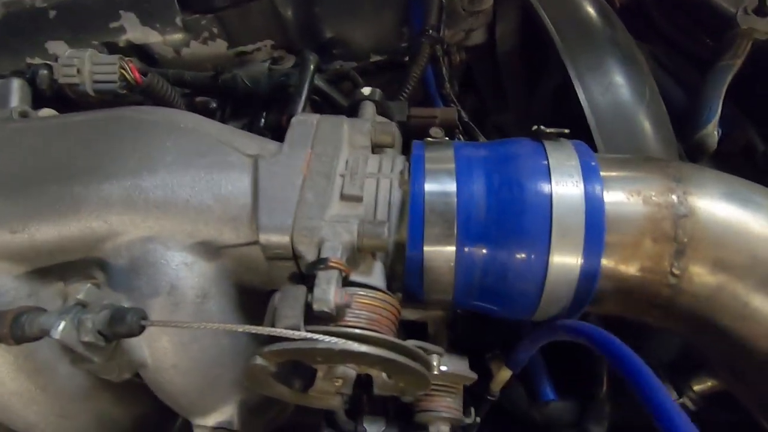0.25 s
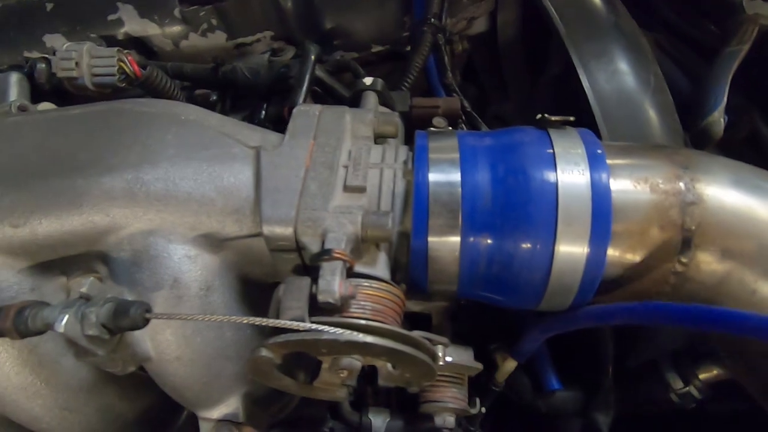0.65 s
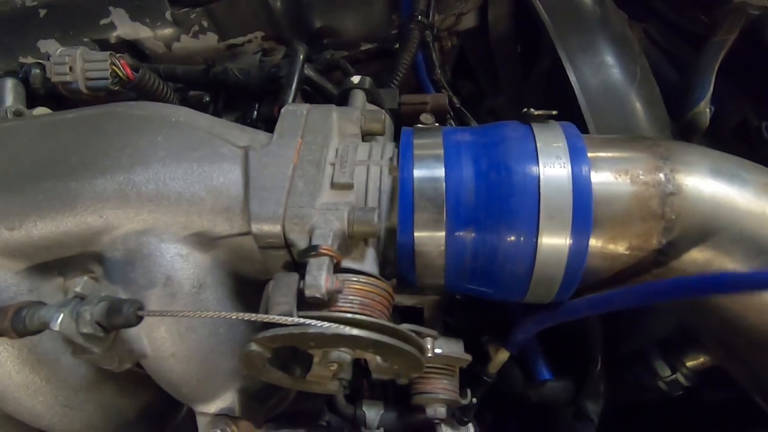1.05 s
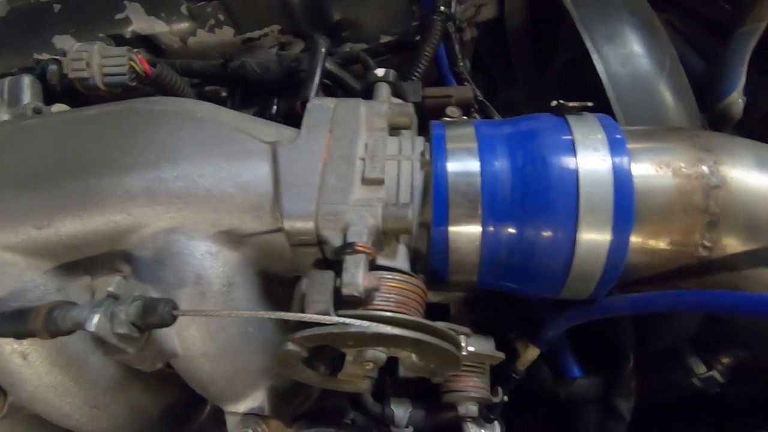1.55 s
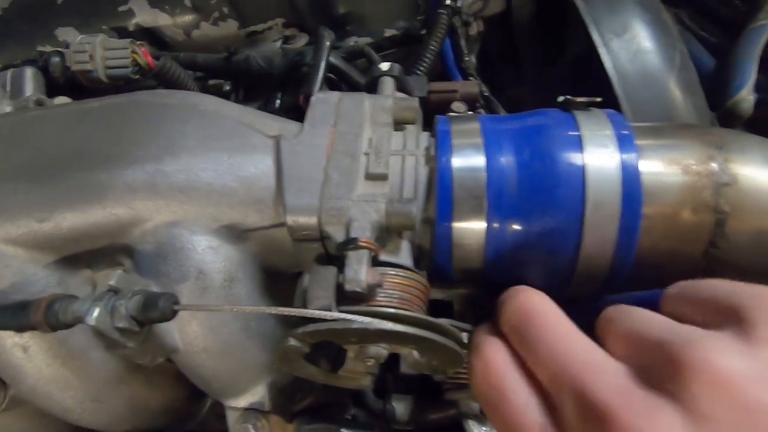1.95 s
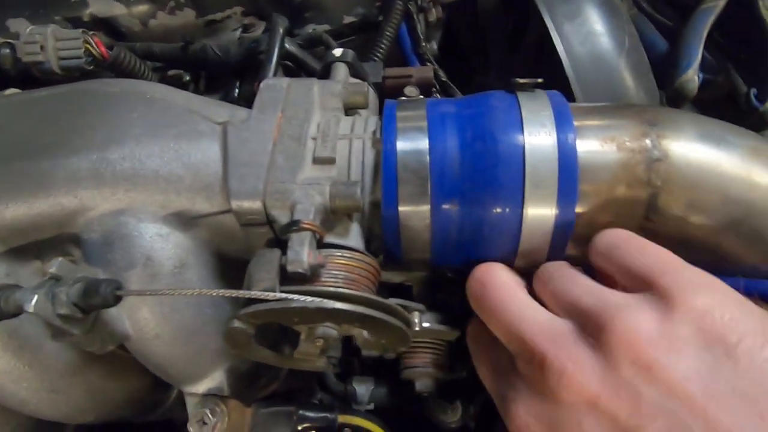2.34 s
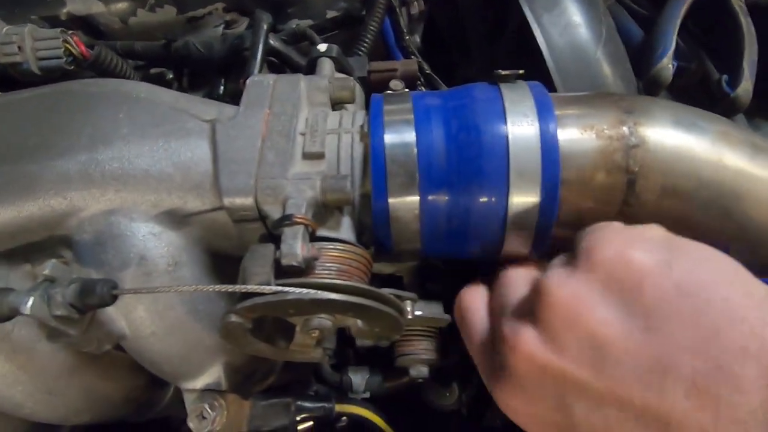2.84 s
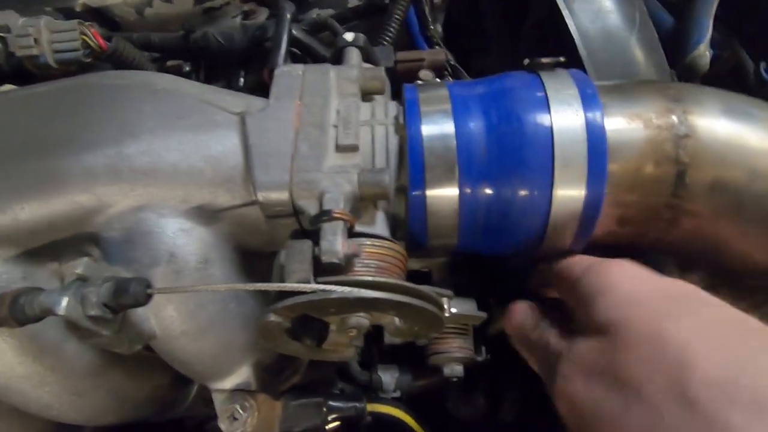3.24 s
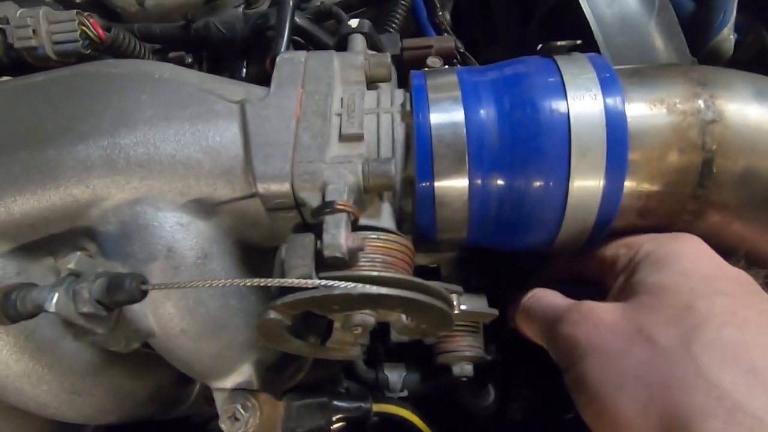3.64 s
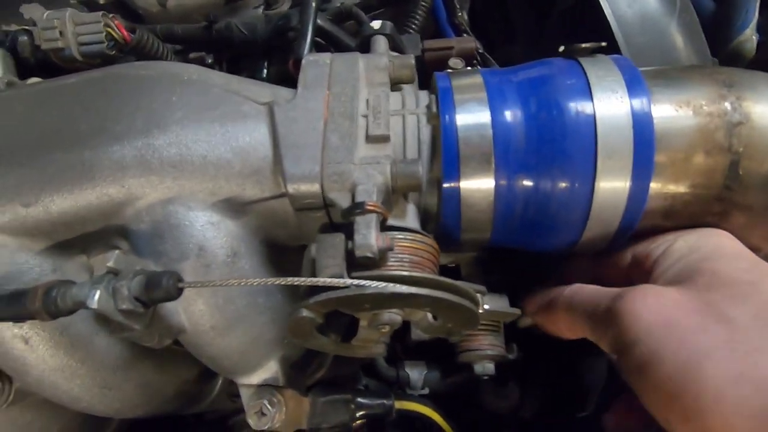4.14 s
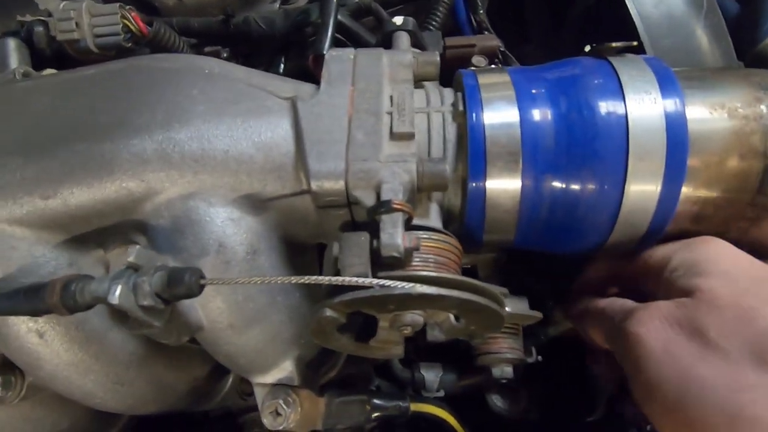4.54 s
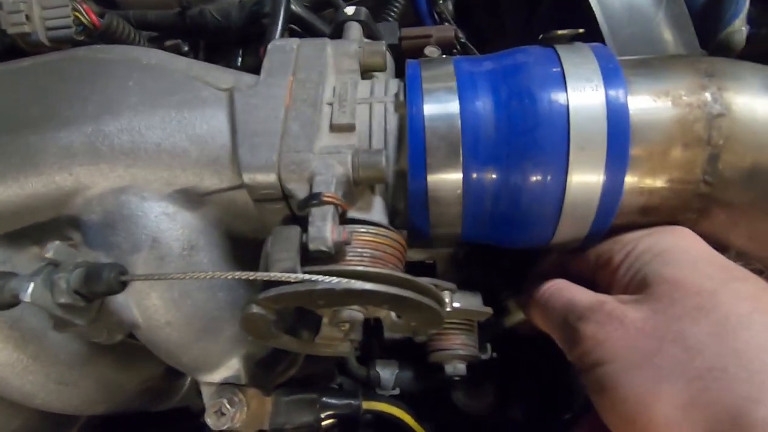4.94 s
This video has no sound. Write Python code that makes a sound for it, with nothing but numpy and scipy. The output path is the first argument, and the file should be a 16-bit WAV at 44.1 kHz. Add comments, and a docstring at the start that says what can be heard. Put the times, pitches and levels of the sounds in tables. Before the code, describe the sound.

From 0 to about 0.23 s, a coarse gush of air falls in hiss while the pipe's ringing around 3 to 5 kHz swells, then stops abruptly with a faint bump. A strong leak takes over at once: a breathy whistle scooping up to roughly 7.5 kHz over a broad rush and fine fizz. Its surge fades over the first second or so; it continues to the end at about 5 s, slowly weakening, narrowing and wavering. A hard, hollow knock lands near 1.45 s with rubbing and scuffs until 1.85 s. Soft thuds and low drags follow at 1.95 to 2.6 s. From 3.0 to 3.8 s comes a busy cluster of knocks and rubs, strongest near 3.15 and 3.43, as the hand slightly colours the hiss. Another knock falls at 4.37, faint taps and rubbing after 4.7. Close, right-leaning stereo; tight engine-bay reflections, faint garage tail, very quiet low drone.

```python
"""A leak of compressed air hisses and whistles near 7.5 kHz, close to a two-port microphone in a garage.
A hose feeds a car's intake piping: a broad gush of coloured noise is cut off and the leak takes over.
The whistle is resonant noise with a tonal core; it narrows as the pressure sinks. Noise makes the rush.
A hand reaches under the pipe: knocks and bumps ring damped modes, scuffs and rubs are friction noise.
Reflections off the engine bay, a faint garage tail and a low drone lie behind."""
import sys
import numpy as np
from scipy import signal
from scipy.fft import rfft, irfft, next_fast_len
from scipy.io import wavfile
from scipy.ndimage import uniform_filter1d

SR = 44100
rng = np.random.default_rng(int(sys.argv[2]) if len(sys.argv) > 2 else 0)


def waveform_to_disk(signal):
    """Save audio, clipped to [-1, 1], as 16-bit WAV at the path in sys.argv[1]."""
    frames = np.transpose(np.atleast_2d(signal))
    scaled = np.clip(frames, -1, 1) * 32767
    samples = np.round(scaled).astype(np.int16)
    wavfile.write(sys.argv[1], SR, samples)


N = 228886
SIZE, HOP = 512, 128  # spectral frame and its step [samples]
HZ = np.fft.rfftfreq(SIZE, 1 / SR)
FRAME_S = np.arange(N // HOP + 5)[:, None] * HOP / SR  # frame times, as a column
TIME = np.arange(N) / SR

# The hose seats in the pipe: the gush is cut off and the leak takes over.
SEAT_S, SEAT_TAKES_S = 0.234, 0.0055
# The surge of pressure left by the gush dies away with this time constant.
SURGE_S = 0.6
# How squarely the jet meets the edge of the gap; on it the whistle swells, off it a hollow rings:
# (time [s], aim [dB])
AIM = [(0.27, -1), (0.33, 2), (0.55, 0.5), (0.615, -2.5), (0.79, 1.5), (0.93, -3), (1.11, -4.5),
       (1.27, 1.5), (1.43, -1.5), (1.62, 0.5), (1.77, -1), (2.23, -3.5), (2.35, 1.5), (2.71, -0.5),
       (3.12, 2), (3.65, 0.5), (3.87, 3.5), (3.94, -2.5), (4.02, 2), (4.27, 1), (4.36, 4.5), (4.5, -1),
       (4.68, -1), (4.93, 1), (5.15, -1)]
# Where the leak lies as the microphone drifts, before each layer's own offset:
# (time [s], left minus right [dB])
LEAK_PAN = [(0.26, -6.5), (0.42, -6), (2.3, -1), (4.39, -3.5), (4.47, 0), (5.19, -6)]


def amp(db):
    """Decibels to gain."""
    return 10 ** (np.asarray(db) / 20)


def evened(x):
    """Scales to an rms of one."""
    return x / np.sqrt(np.mean(x ** 2) + 1e-20)


def read(points, hz=HZ):
    """A spectrum joined by straight lines on a log-frequency axis."""
    f, value = np.transpose(points)
    return np.interp(np.log(hz + 1), np.log(f + 1), value)


def follow(points, t=FRAME_S):
    """A curve joined by straight lines, at the times t."""
    s, value = np.transpose(points)
    return np.interp(t, s, value)


def sampled(control):
    """A value a frame, spread over the samples."""
    return np.interp(TIME, FRAME_S[:, 0], control[:, 0])


def add(mix, s, sound):
    """Mixes a stereo sound in at time s."""
    part = mix[:, max(round(s * SR), 0):][:, :sound.shape[1]]
    part += sound[:, :part.shape[1]]


def placed(x, pan_db):
    """Shares the power of x between left and right; pan_db is left minus right."""
    gains = np.array([amp(pan_db / 2), amp(-pan_db / 2)]).reshape(2, -1)
    return x * gains / np.sqrt(np.mean(gains ** 2, 0))


def filtered(x, response):
    """Applies a fixed frequency response."""
    size = next_fast_len(N + SIZE)
    return irfft(rfft(x, size) * response(np.fft.rfftfreq(size, 1 / SR)), size)[..., :N]


def resonance(hz, centre_hz, width_hz):
    """Gain of one resonance."""
    return 1 / np.sqrt(1 + (2 * (hz - centre_hz) / width_hz) ** 2)


def peaks(rows, hz=HZ):
    """Lift in dB of a set of resonances."""
    return sum(db * resonance(hz, f, width) ** 2 for f, width, db in rows)


def unit(shape, band=slice(None)):
    """Scales a spectrum so that noise through it has an rms of one in the band."""
    return shape / np.sqrt(np.sum(shape[..., band] ** 2, -1, keepdims=True) / len(HZ))


def wander(slow_hz, fast_hz):
    """Random drift of rms one, a sum of sines between two rates, a value a frame."""
    rates = np.geomspace(slow_hz, fast_hz, 40)
    turns = rates * FRAME_S + rng.random(len(rates))
    return evened(np.sin(2 * np.pi * turns).sum(1))[:, None]


def eddies(frames=5, bins=9):
    """Random patches of rms one over time and frequency."""
    field = rng.standard_normal((len(FRAME_S), len(HZ)))
    return evened(uniform_filter1d(uniform_filter1d(field, frames, 0), bins, 1))


def lingering(depth_db):
    """Narrow airy bands in dB that last about a fifth of a second as the jet wanders."""
    return depth_db * eddies(frames=70, bins=3)


def ports(hz):
    """Gain and phase with which each of the two microphone ports hears the leak."""
    # The port pair: (frequency [Hz], left leads by [rad], left minus right [dB])
    port_rows = [(493, 0, 1.5), (1170, 2, -4.5), (3220, 0.5, -1), (5970, -3.5, 1.5), (6000, -3, -1),
                 (7300, -2.5, 1.5), (7940, -2, 1.5), (8760, -4.5, 6), (15800, -8.5, 6)]
    f, lead, pan_db = np.transpose(port_rows)
    lead = read(np.c_[f, lead], hz)
    pan_db = read(np.c_[f, pan_db], hz)
    return placed(np.exp(np.array([[.5j], [-.5j]]) * lead), pan_db)


def noise(gain, alike):
    """Noise with a gain per frame and bin; the jet is wide, so the ports share only a part of its power."""
    white = rng.standard_normal((3, (len(FRAME_S) - 1) * HOP))
    z = signal.stft(white, nperseg=SIZE, noverlap=SIZE - HOP)[2]
    pair = np.sqrt(alike) * z[0] + np.sqrt(1 - alike) * z[1:]
    heard = pair * ports(HZ)[:, :, None] * gain.T
    return signal.istft(heard, nperseg=SIZE, noverlap=SIZE - HOP)[1][:, :N]


def garage_drone(level_db=-71.5):
    """The garage's low drone: steady noise with a fixed colour, slightly different at each port."""
    # Relative colour: (frequency [Hz], level [dB])
    garage_colour = [(20, -20), (70, -10), (115, -35), (153, 6.5), (190, -5), (300, -6), (700, -25),
                     (3000, -20.5)]
    white = rng.standard_normal((2, N))
    mid, side = evened(filtered(white, lambda hz: amp(read(garage_colour, hz))))
    return amp(level_db) * (mid + np.array([[.3], [-.3]]) * side)


def echoes(x, t60, count=3, apart_hz=500, drift_s=1.467):
    """Dense reflections, alike at both ports in the bass, that shift as the microphone drifts."""
    t = np.arange(SR // 2) / SR
    highpass = signal.butter(2, apart_hz, "high", fs=SR, output="sos")
    out = np.zeros((2, N))
    for k in range(count):
        mid, side = rng.standard_normal((2, len(t))) * amp(-60 * t / t60) * (t > .002)
        side = signal.sosfilt(highpass, side)
        tail = np.array([mid + side, mid - side]) / np.linalg.norm(mid + side)
        # the shares of the tails trade places while their total power holds
        share = np.cos(np.pi * (TIME / drift_s + k / count)) * np.sqrt(2 / count)
        out += signal.oaconvolve(x * share, tail, axes=1)[:, :N]
    return out


def ring(modes, tilt_db=0, rise_cycles=1.0, scatter=0.031):
    """A padded blow rings slightly scattered modes, each swelling over about a cycle; peak of one."""
    t = np.arange(SR // 5) / SR
    hz, db, t60 = np.transpose(modes)[:, :, None]
    hz = hz * (1 + scatter * rng.standard_normal(hz.shape))
    decay = amp(db + tilt_db * np.log2(hz / hz.mean()) - 60 * t / t60)
    rise = 1 - np.exp(-(t * hz / rise_cycles) ** 2)
    tone = (decay * rise * np.sin(2 * np.pi * hz * t)).sum(0)
    return tone / abs(tone).max()


def crack(hz=2450, half_width_octaves=0.41, fade_s=0.00067):
    """The short hard click of first contact, a band of fading noise; peak of one."""
    t = np.arange(SR // 50) / SR
    edges_hz = hz * 2 ** (np.array([-1, 1]) * half_width_octaves)
    band = signal.butter(2, edges_hz, "band", fs=SR, output="sos")
    click = signal.sosfilt(band, rng.standard_normal(len(t)) * np.exp(-t / fade_s))
    return click / abs(click).max()


def knocks(knock_db=2, crack_db=-6):
    """Knocks of hand and hose on the piping: each a crisp touch, then the full weight, with a crack."""
    # Blows, before the level offsets: (time [s], level [dB], upper ring against the whole [dB])
    knock_rows = [(1.443, -22, 2), (1.473, -32, 6), (1.483, -40, 10), (1.492, -39.5, 8), (1.792, -52.5, 3),
                  (2.991, -45.5, -4), (3.057, -43.5, 2), (3.092, -39.5, 9), (3.144, -29, 11.5),
                  (3.206, -34.5, 14), (3.339, -33.5, 7.5), (3.358, -49, 0), (3.433, -27.5, 11.5),
                  (3.482, -45, 9.5), (3.507, -39.5, 0), (3.558, -42.5, 16), (3.576, -34, 11),
                  (3.633, -45, 4), (3.747, -42, 0.5), (3.761, -42.5, -8), (3.777, -38.5, 11),
                  (3.798, -40.5, -10), (4.369, -31.5, 4), (4.383, -41, -15), (4.707, -51.5, -8),
                  (4.761, -43, 11), (4.774, -53.5, 11.5), (4.965, -51, 1)]
    # The two landings of a blow: (delay [s], level [dB], tilt [dB per octave])
    contacts = [(-.0018, -2.5, 1.0), (.0023, -1.5, 0)]
    # Nominal ring of the piping: (frequency [Hz], relative level [dB], t60 [s])
    pipe_modes = [(483, 8.5, 0.028), (570, -2, 0.0073), (758, 8.5, 0.02), (972, 1, 0.035), (1107, 4, 0.018),
                  (1314, 2, 0.018), (1600, 0, 0.0092), (2140, -10, 0.013)]
    out = np.zeros((2, N))
    hardest_db = max(db for _, db, _ in knock_rows)
    for s, db, bright_db in knock_rows:
        click_db = db + crack_db + (db - hardest_db)  # softer knocks crack far less
        add(out, s - .001, placed(amp(click_db) * crack(), pan_db=-12))
        for delay_s, blow_db, tilt_db in contacts:
            tone = ring(pipe_modes, tilt_db + 0.66 * (bright_db - 4.0))
            add(out, s + delay_s, placed(amp(db + knock_db + blow_db) * tone, pan_db=-7))
    return out


def bumps():
    """Soft bumps ring only the low modes of the piping."""
    # (time [s], peak level [dB])
    bump_rows = [(0.232, -52), (1.449, -47), (1.952, -44.5), (2.409, -47.5), (2.47, -55), (3.152, -46),
                 (3.208, -43.5), (3.747, -45.5), (3.79, -48.5)]
    # Nominal low modes: (frequency [Hz], relative level [dB], t60 [s])
    thud_modes = [(79, -17.5, 0.1), (152.3, -11.5, 0.19), (207.5, -9.5, 0.1), (263, -11.5, 0.045)]
    out = np.zeros((2, N))
    for s, db in bump_rows:
        add(out, s - .002, placed(amp(db) * ring(thud_modes), pan_db=-1.5))
    return out


def stroke(start_s, length_s, level_db, rise_s=0.0031, fade_db=-6, release_s=0.026):
    """Grip of one stroke over time: it takes hold, eases along the way and lets go."""
    t = TIME - start_s
    fade = amp(level_db + fade_db * np.clip(t / length_s, 0, 1))
    return np.clip(t / rise_s, 0, 1) * fade * np.exp(-np.maximum(t - length_s, 0) / release_s)


def rubbing(strokes, colour, grain_db):
    """Uneven friction noise under a set of strokes."""
    grip = sum(stroke(*row) for row in strokes) * amp(grain_db * sampled(wander(13, 90)))
    return grip * evened(filtered(rng.standard_normal(N), lambda hz: amp(read(colour, hz))))


def friction(scuff_db=2):
    """The hand rubs along the pipe, drags on the rubber hose so the piping rumbles, and scuffs the metal."""
    # Strokes along the pipe, drags on the hose, and short bright scuffs of skin on metal (before scuff_db):
    # (start [s], length [s], level at the start [dB])
    strokes = [(1.298, 0.2, -58), (1.447, 0.1, -53), (1.572, 0.28, -59.5), (2.33, 0.29, -71),
               (2.63, 0.13, -58.5), (2.985, 0.063, -54.5), (3.15, 0.2, -55), (3.33, 0.596, -59),
               (3.74, 0.083, -50), (4.278, 0.26, -65), (4.69, 0.3, -62.5)]
    drags = [(2.015, 0.29, -63.5), (2.325, 0.25, -61.5)]
    scuffs = [(1.468, 0.006, -42), (1.603, 0.021, -48), (1.662, 0.029, -53), (1.788, 0.017, -49),
              (2.394, 0.015, -53.5), (3.203, 0.017, -46), (4.272, 0.026, -55.5), (4.76, 0.036, -58)]
    # Their relative colours: (frequency [Hz], level [dB])
    rub_colour = [(75, -22), (115, -24), (160, 3), (270, -1), (450, 2), (800, -5), (2000, -14), (6000, -57)]
    drag_colour = [(100, -24.5), (160, 1.5), (205, -5), (400, -16), (1500, -60)]
    scuff_colour = [(150, -12.5), (450, 5.5), (1000, -2.5), (2400, -3), (4300, -9), (8000, -43)]
    rub = placed(rubbing(strokes, rub_colour, grain_db=1.5), pan_db=-1.5)
    drag = rubbing(drags, drag_colour, grain_db=2.0)
    scuff = placed(amp(scuff_db) * rubbing(scuffs, scuff_colour, grain_db=2.5), pan_db=-1.5)
    return rub + drag + scuff


def hand():
    """Everything the hand does: impacts ring the piping and sliding makes friction noise."""
    return knocks() + bumps() + friction()


def seated(early_s=0):
    """Zero while the hose is loose, one once it sits, a value a frame."""
    return np.clip((FRAME_S - SEAT_S + early_s) / SEAT_TAKES_S, 0, 1)


def surge(fade_s=SURGE_S):
    """What is left of the surge of pressure: one until the hose seats, then towards zero, a value a frame."""
    return np.exp(-np.maximum(FRAME_S - SEAT_S, 0) / fade_s)


def cavities(hz, low_hz=140):
    """The spaces round the leak lift their own frequencies; below about 140 Hz the hiss fades away."""
    # Air resonances of the piping and the spaces round it: (frequency [Hz], width [Hz], lift [dB])
    air_modes = [(440, 83, 4), (876, 370, 6), (2597, 41, 6.5), (3218, 50, 5.5), (3610, 140, 1.5)]
    return amp(peaks(air_modes, hz)) * (1 - 1 / (1 + (hz / low_hz) ** 4))


def gush(level_db=-35, burst_db=8.5, burst_s=0.09, swell_db=4.5, start_hz=8800, end_hz=4200, fall_s=0.048,
         lift_db=9, width_hz=900, patchy_db=2.0):
    """Air spills past the hose end with a falling hiss; the pipe rings more and more until the gush stops."""
    # Relative colour: (frequency [Hz], level [dB])
    gush_colour = [(850, -19.5), (1700, -5.5), (2600, -3), (4400, -9), (6000, 2.5), (7800, 3), (8800, -5),
                   (12000, -12.5), (15500, -31)]
    # The pipe's resonances, driven harder as the gap closes:
    # (frequency [Hz], width [Hz], lift once closed [dB])
    gush_rings = [(3280, 190, 27), (4100, 260, 12), (4740, 660, 19.5)]
    closing = np.clip(FRAME_S / SEAT_S, 0, 1) ** 1.5
    blow_db = level_db + burst_db * np.exp(-FRAME_S / burst_s) + swell_db * closing ** 2
    centre_hz = end_hz + (start_hz - end_hz) * np.exp(-FRAME_S / fall_s)
    lifts_db = lift_db * resonance(HZ, centre_hz, width_hz) ** 2 + closing * peaks(gush_rings)
    shape = unit(amp(read(gush_colour) + lifts_db))
    gain = shape * amp(blow_db + patchy_db * eddies()) * (1 - seated())
    return placed(filtered(noise(gain, alike=0.76), cavities), pan_db=-5.5)


def swells():
    """Lift in dB over time and frequency of bands that swell or sink for a while as the jet shifts."""
    # (middle [s], length [s], frequency [Hz], width [Hz], lift [dB])
    swell_rows = [(0.547, 0.14, 5600, 704, 15), (0.628, 0.11, 910, 900, 9), (0.71, 0.17, 4540, 1200, -13),
                  (0.85, 0.79, 2590, 607, 6.5), (1.1, 0.066, 3970, 800, 5.5), (1.21, 0.26, 1990, 250, 4),
                  (1.41, 0.42, 3330, 900, -9), (1.906, 2.1, 3720, 130, 5.5), (2.787, 0.29, 1980, 300, 4.5),
                  (2.76, 0.31, 3920, 700, 4.5), (4.057, 0.19, 3660, 420, 4.5), (4.116, 0.28, 480, 454, -14),
                  (4.6, 1.6, 1850, 260, -4.5), (5.04, 0.43, 1020, 190, 4)]
    lift_db = 0
    for s, length, hz, width, db in swell_rows:
        presence = 1 / (1 + (2 * (FRAME_S - s) / length) ** 6)
        lift_db = lift_db + db * resonance(HZ, hz, width) ** 2 * presence
    return lift_db


def cupped(from_s=2.9, takes_s=0.27):
    """The hand closes round the leak; the hollow under it lifts some tones and cancels others, in dB."""
    # (frequency [Hz], width [Hz], lift once closed [dB])
    cup_modes = [(970, 83, 5.5), (1530, 170, 2.5), (2430, 210, -4), (3010, 98, 0.5), (3980, 120, 5),
                 (4300, 220, -1.5), (5300, 170, -3)]
    return np.clip((FRAME_S - from_s) / takes_s, 0, 1) * peaks(cup_modes)


def rush(stir, body_db=-1.5, thin_db=-9.5, thin_below_hz=1770, thin_s=0.66, hollow_hz=3850,
         hollow_width_hz=1200, hollow_db=-2, hollow_surge_db=8, hollow_share=0.63):
    """The body of the escaping air, turbulent noise that rings a hollow when the jet slips off the edge."""
    # Relative colour: (frequency [Hz], level [dB])
    body_colour = [(100, -8), (600, -15), (1300, -7), (2000, -1.5), (2500, -4.5), (3300, 0.5), (4100, 1.5),
                   (4600, -0.5), (6000, -3), (8000, -2.5), (11000, -44)]
    # Level before body_db and the lifts: (time [s], level [dB])
    rush_level = [(0.27, -38.5), (0.39, -47), (0.57, -42.5), (0.71, -46.5), (1.01, -47.5), (1.11, -46),
                  (1.73, -48), (1.91, -51.5), (2.45, -49), (3.03, -48.5), (3.35, -50), (5.15, -52.5)]
    lift_db = hollow_db + hollow_surge_db * surge() - hollow_share * follow(AIM)
    hollow = lift_db * resonance(HZ, hollow_hz, hollow_width_hz) ** 2
    # a strong jet is thin at the bottom; its lower body fills in as the surge fades
    thin = thin_db * surge(thin_s) / (1 + (HZ / thin_below_hz) ** 4)
    colour = unit(amp(read(body_colour) + thin + hollow), (HZ > 1500) & (HZ < 5200))
    blow_db = follow(rush_level) + body_db + swells() + cupped() + lingering(1.8)
    return filtered(noise(colour * amp(blow_db) * stir, alike=0.27), cavities)


def spray(stir):
    """The fine treble fizz of the escaping air, turbulent noise."""
    # Relative colour: (frequency [Hz], level [dB])
    fizz_colour = [(3000, -30), (7000, 9), (9000, 9), (10100, 8.5), (11200, 0.5), (12500, 1), (13800, -3.5),
                   (15200, 5), (16000, -24)]
    # Level before the stir and the cavities: (time [s], level [dB])
    fizz_level = [(0.25, -52.5), (0.55, -53.5), (0.69, -57.5), (0.97, -52), (1.55, -51), (1.91, -56),
                  (2.37, -55), (3.01, -61.5), (3.13, -53), (3.17, -56.5), (5.17, -61)]
    colour = unit(amp(read(fizz_colour)), (HZ > 10500) & (HZ < 14500))
    return filtered(noise(colour * amp(follow(fizz_level)) * stir, alike=0.55), cavities)


def jet(flutter_db=-0.05, patchy_db=2.0, pan_share=0.45, pan_db=-2):
    """The broad rush of escaping air: a body and a fine fizz, stirred alike by the same turbulence."""
    stir = amp(flutter_db * wander(7.9, 60) + patchy_db * eddies())
    body = placed(rush(stir), pan_share * follow(LEAK_PAN, TIME) + pan_db)
    return body + placed(spray(stir), pan_db=-9.0)


def whistle(level_db=-35.5, surge_db=9.0, sink_db_per_s=0.44, loose_db=-22, early_s=0.0086, alike=0.77,
            surge_flat_hz=380, bend_hz_per_db=12, scoop_hz=650, scoop_s=0.046, waver_hz=35,
            start_width_hz=1770, narrowing_s=6.16, skirt=2.17, lock_rest=0.4, lock_per_db=0.27,
            core_hz=90, flutter_db=0.1, patchy_db=2.5, pan_db=-2):
    """Turbulence drives the gap's resonance; a jet square on the edge locks and a narrow core stands out."""
    # Pitch once the surge is taken out: (time [s], frequency [Hz])
    pitch = [(.3, 7510), (1.4, 7450), (2.1, 7670), (2.9, 7653), (4.2, 7616), (5.15, 7604)]
    # Side modes of the gap, rung by the surge: (frequency [Hz], width [Hz], lift at full surge [dB])
    shoulders = [(6300, 3400, 6), (8080, 1100, 11.5)]
    aim_db = follow(AIM)
    blow_db = level_db + surge_db * surge() - sink_db_per_s * FRAME_S + aim_db
    blow_db = blow_db + loose_db * (1 - seated(early_s))
    # the whistle starts flat, scoops up as it catches and rises as the surge fades
    flat_hz = (surge_flat_hz - bend_hz_per_db * aim_db) * surge() + scoop_hz * surge(scoop_s)
    pitch_hz = follow(pitch) - flat_hz + waver_hz * wander(2.4, 40)
    narrowness = np.exp(-FRAME_S / narrowing_s)
    lock = np.clip(lock_rest + lock_per_db * aim_db, 0, 1) * (1 - narrowness)

    # the hiss: noise through the resonance, its slopes steepened by the skirt exponent
    shape = resonance(HZ, pitch_hz, start_width_hz * narrowness) ** skirt * amp(surge() * peaks(shoulders))
    airy = unit(shape, (HZ > 6500) & (HZ < 8600)) * amp(patchy_db * eddies() + lingering(1.2))
    hiss = filtered(noise(airy * np.sqrt(1 - lock), alike), cavities)

    # the core: a tone whose strength and phase drift at random
    turn = np.exp(2j * np.pi * np.cumsum(sampled(pitch_hz)) / SR)
    lowpass = signal.butter(2, core_hz / 2, fs=SR, output="sos")
    drift = signal.sosfilt(lowpass, rng.standard_normal(N) + 1j * rng.standard_normal(N))
    core = evened((turn * drift * ports(pitch_hz.mean(0))).real) * sampled(np.sqrt(lock))

    strength = amp(blow_db + flutter_db * wander(41, 110))
    return placed((hiss + core) * sampled(strength), follow(LEAK_PAN, TIME) + pan_db)


def scene():
    """Leak and hand are heard directly and off the engine bay; the garage adds a faint tail and a low drone."""
    direct = hand() + gush() + jet() + whistle()
    near = direct + amp(-6.5) * echoes(direct, t60=0.12)
    return garage_drone() + near + amp(-20.0) * echoes(near, t60=1.0)


def record(dry, edge_hz=15780):
    """The recorder's band limit, a steep low-pass."""
    lowpass = signal.firwin(511, edge_hz, window=("kaiser", 9), fs=SR)
    return signal.oaconvolve(dry, lowpass[None], "same")


dry = scene()
out = record(dry)
waveform_to_disk(out)
```